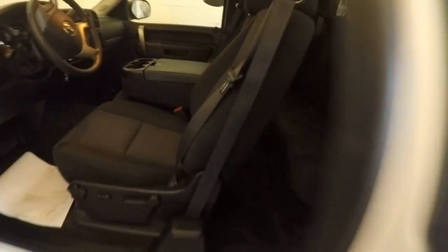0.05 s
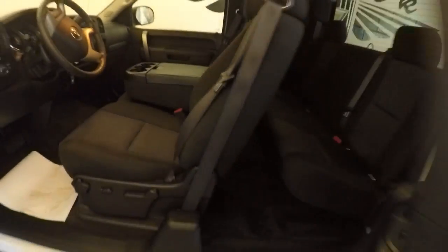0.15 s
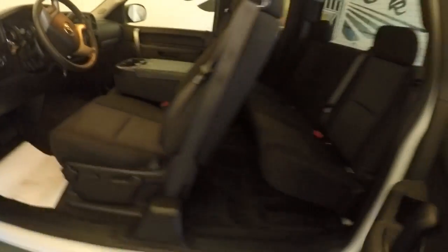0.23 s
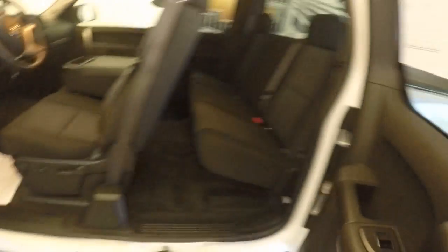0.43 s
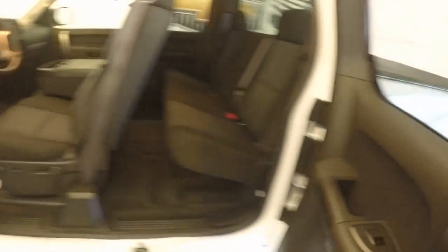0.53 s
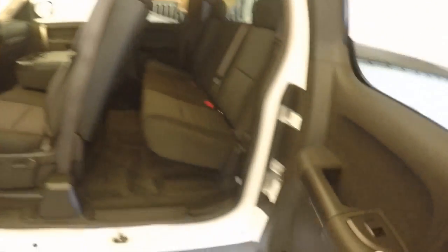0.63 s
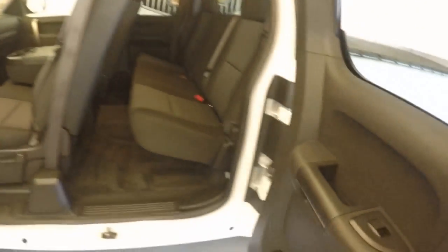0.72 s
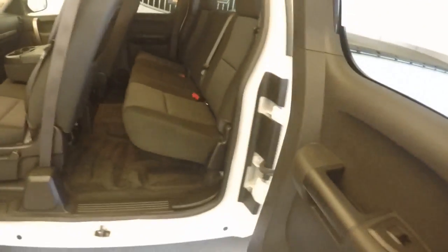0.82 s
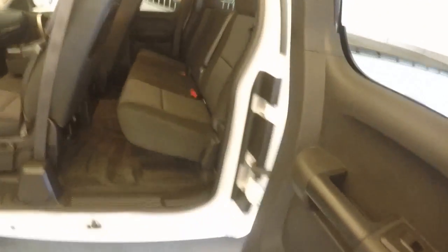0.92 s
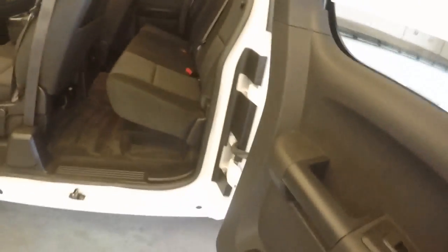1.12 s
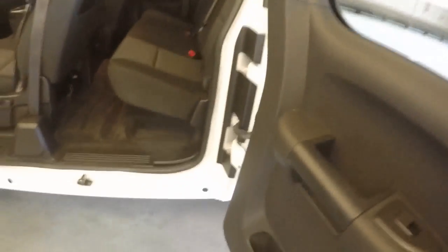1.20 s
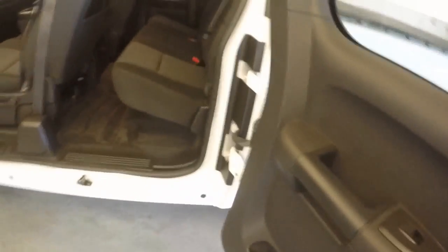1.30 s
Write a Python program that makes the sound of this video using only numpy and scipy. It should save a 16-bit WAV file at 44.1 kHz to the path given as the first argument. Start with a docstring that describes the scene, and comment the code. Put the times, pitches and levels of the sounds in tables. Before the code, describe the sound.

Close to a hand-held microphone in an open lot, a truck door latch clacks sharply, the panel knocks softly as the door swings, then thuds at its stop with little ticks, over quiet hiss and rumble.

```python
"""An open lot, a pickup door opened close to a hand-held camera and its microphone.
A latch snaps and rattles as decaying metal modes with noise cracks; the door shell rings on as a noise tail.
Knocks and bumps, soft blows on panel modes, follow as the door swings to its stop, with small ticks.
Beneath lie low rumble (a wavering tone in noise), distant traffic hiss and a rustle that follows the door
(both coloured noise), and the camera's faint whine, a pulsed sine."""
import sys
import numpy as np
from scipy import signal
from scipy.fft import rfft, irfft
from scipy.io import wavfile
from scipy.ndimage import uniform_filter1d

SR = 44100
rng = np.random.default_rng(int(sys.argv[2]) if len(sys.argv) > 2 else 0)


def wrap_up_sound(samples):
    """Save the sound to the file named by the first command line argument, as 16-bit audio."""
    columns = np.atleast_2d(samples).T
    # keep every value between -1 and 1, then stretch to whole-number steps
    tamed = np.clip(columns, -1, 1)
    steps = np.round(tamed * 32767).astype(np.int16)
    wavfile.write(sys.argv[1], SR, steps)


def decibels_to_gain(level_db):
    """Convert a level in decibels to a linear amplitude gain (20 dB per decade)."""
    exponent = np.asarray(level_db, float) / 20
    return 10 ** exponent


N = 59535  # samples, 1.35 s


def evened(x):
    """Scale to rms 1."""
    return x / np.sqrt(np.mean(x ** 2) + 1e-20)


def read_curve(points, hz, column=1):
    """Read a table column at the given frequencies, interpolating along log frequency."""
    table = np.transpose(points)
    return np.interp(np.log(hz + 1), np.log(table[0] + 1), table[column])


def along(points):
    """Read a (start_s, level_db) line at every sample."""
    return np.interp(np.arange(N) / SR, *np.transpose(points))


def add(mix, start_s, sound):
    """Lay a sound into the mix, cut off at the end."""
    part = mix[round(start_s * SR):][:len(sound)]
    part += sound[:len(part)]


def coloured(gain, size):
    """Noise of rms 1 with its spectrum shaped by gain(hz)."""
    spectrum = rfft(rng.standard_normal(size))
    return evened(irfft(spectrum * gain(np.fft.rfftfreq(size, 1 / SR)), size))


def around(hz, centre_hz, octaves):
    """Bell-shaped weight about a centre on an octave scale."""
    distance = np.log2((hz + 1) / centre_hz) / octaves
    return np.exp(-0.5 * distance ** 2)


def ring(modes, weights, share):
    """Struck metal: dying sines that start together, each t60 times share; peak 1."""
    t = np.arange(9000) / SR
    pitch_hz, level_db, t60_s = np.transpose(modes)[:, :, None]
    decay = decibels_to_gain(level_db - 60 * t / (t60_s * share))
    sines = np.sin(2 * np.pi * pitch_hz * t)
    sound = (weights[:, None] * decay * sines).sum(0)
    return sound / abs(sound).max()


BURST_LEAD_S = 0.002  # silence ahead of each burst, room for the colouring to spread


def burst(gain, t60_s):
    """A crack: dying noise, then coloured, scaled by energy to start near rms 1."""
    size = 4096
    t = np.arange(size) / SR
    decay = decibels_to_gain(-60 * (t - BURST_LEAD_S) / t60_s) * (t > BURST_LEAD_S)
    puff = rng.standard_normal(size) * decay
    sound = irfft(rfft(puff) * gain(np.fft.rfftfreq(size, 1 / SR)))
    decay_energy = SR * t60_s / np.log(1e6)
    return sound / np.sqrt(np.sum(sound ** 2) / decay_energy)


# level of the low rumble over time: start_s, level_db
RUMBLE_LEVEL = [(0.0, -44.5), (0.04, -41.5), (0.078, -56.5), (0.334, -61.5), (0.356, -82), (0.394, -42.5),
                (0.438, -79), (0.5, -48), (0.882, -61.5), (0.936, -37.5), (1.07, -49), (1.134, -49),
                (1.188, -63), (1.228, -46), (1.304, -61), (1.35, -90)]


def rumble():
    """Sub-bass from the swinging door skin and the wind: a wavering tone in lumpy noise."""
    centre_hz, width_hz = 32.5, 9.8
    waver_hz = 3.8  # rms
    tone_share = 0.64  # of the power

    def hump(hz):
        return 1 / (1 + ((hz - centre_hz) / width_hz) ** 2) * (hz > 12)

    lumps = coloured(hump, N)
    pitch_hz = centre_hz + waver_hz * coloured(lambda hz: hz < 8, N)
    boom = np.sqrt(2) * np.sin(2 * np.pi * (np.cumsum(pitch_hz) / SR + rng.random()))
    mixed = np.sqrt(tone_share) * boom + np.sqrt(1 - tone_share) * lumps
    return decibels_to_gain(along(RUMBLE_LEVEL)) * mixed


# colour of the distant traffic hiss: pitch_hz, level_db (per Hz, relative)
HISS_COLOUR = [(29, -53), (50, 2.5), (135, -8.5), (163, -12), (208, -5.5), (353, -18), (746, -19.5),
               (863, -25.5), (1620, -22.5), (12600, -38.5), (16000, -39.5)]


def traffic_hiss():
    """Distant traffic: steady coloured noise at -56.5 dB rms."""
    return decibels_to_gain(-56.5) * coloured(lambda hz: decibels_to_gain(read_curve(HISS_COLOUR, hz)), N)


# rustle of the swinging door over time: start_s, level_db
RUSTLE_LEVEL = [(0.0, -62), (0.334, -51), (0.548, -64.5), (0.812, -64.5), (1.048, -56.5), (1.35, -65.5)]
# colour of the rustle: pitch_hz, level_db (per Hz, relative)
RUSTLE_COLOUR = [(300, 0.5), (700, 0.5), (1450, -1), (1680, 3), (1950, -6), (2900, -4), (3550, -2.5),
                 (4200, -10), (7000, -19), (10000, -43)]


def rustle():
    """Coloured noise that swells and sinks with the swinging door."""
    noise = coloured(lambda hz: decibels_to_gain(read_curve(RUSTLE_COLOUR, hz)), N)
    return decibels_to_gain(along(RUSTLE_LEVEL)) * noise


def camera_whine():
    """The camera's thin high tone, switched on and off at a steady rate."""
    pitch_hz, level_db = 12407, -70
    pulses_per_s, on_s, first_s = 29.97, 0.0155, 0.0015
    t = np.arange(N) / SR
    on = ((t - first_s) % (1 / pulses_per_s) < on_s) * 1.0
    softened = uniform_filter1d(on, size=40)  # about 1 ms edges
    return decibels_to_gain(level_db) * softened * np.sin(2 * np.pi * pitch_hz * t)


# knocks in the door panel: start_s, level_db (before the blow softens it), centre_hz, width_octaves,
# ring_share (of each mode's t60)
KNOCKS = [(.200, -38, 600, 0.43, 3), (0.227, -27, 337, 0.11, 0.93), (.236, -33, 235, 0.053, 1.2),
          (0.357, -44, 270, 0.11, 2), (0.386, -33.5, 194, 0.18, 0.54), (0.399, -44, 239, 0.12, 0.52),
          (.466, -33, 335, 0.44, 2.6), (0.471, -29.5, 270, 0.28, 0.93), (.501, -39, 230, 0.31, 1.7),
          (0.604, -43.5, 550, 0.37, 0.26), (0.766, -51, 740, 0.13, 0.21), (0.881, -47, 284, 0.2, 1.7),
          (.889, -37, 313, 0.077, 1.7), (0.9066, -25.5, 600, 0.31, 0.93), (.9110, -25.5, 206, 0.39, 0.87),
          (.9170, -22, 203, 0.44, 0.42), (0.934, -29, 138.5, 0.47, 1.07), (0.942, -24, 350, 1, 0.52),
          (1.123, -41.5, 268, 0.27, 0.62), (1.134, -42.5, 260, 0.19, 0.27), (1.180, -39.5, 270, 0.14, 0.59),
          (1.230, -46, 784, 0.29, 0.61), (1.242, -41, 253, 0.24, 0.37), (1.272, -46, 270, 0.25, 0.46),
          (1.279, -36.5, 270, 0.15, 0.3), (1.285, -43, 720, 0.06, 0.22), (1.341, -38.5, 350, 0.69, 0.39)]
# modes of the door panel: pitch_hz, level_db (relative), t60_s (at ring_share 1)
PANEL_MODES = [(103, -6, 0.35), (128, -5, 0.2), (195.3, -7, 0.22), (235.5, -3, 0.1), (273.5, 6, 0.17),
               (320, 1, 0.13), (394, 9, 0.027), (550, -2.5, 0.19), (624, 4, 0.083), (720, 2.5, 0.14),
               (900, 11, 0.11), (1114, 5.5, 0.23)]


def panel_knocks():
    """Soft blows ring the panel modes near their centre; a longer blow rounds off the start."""
    blow_cycles = 0.32  # length of a blow in cycles of its centre pitch
    out = np.zeros(N)
    pitch_hz = np.transpose(PANEL_MODES)[0]
    for start_s, level_db, centre_hz, octaves, share in KNOCKS:
        scatter = decibels_to_gain(2.4 * rng.standard_normal(len(pitch_hz)))
        weights = around(pitch_hz, centre_hz, octaves) * scatter
        blow = np.hanning(int(blow_cycles * SR / centre_hz) + 3)
        knock = np.convolve(ring(PANEL_MODES, weights, share), blow / blow.sum())
        add(out, start_s, decibels_to_gain(level_db) * knock)
    return out


# ring of the hollow door and cab: pitch_hz, level_db (relative), t60_s
SHELL_RING = [(102, -6.5, 0.95), (270, -3, 0.37), (600, 4.5, 0.44), (1290, -3.5, 0.37), (2000, 2, 0.52),
              (2800, 2.5, 0.45), (5060, -1, 0.24), (7000, -0.5, 0.32), (14100, -1, 0.23)]


def shell_ring(struck):
    """The hollow door and cab ring on: three dense noise tails, each band dying at its own speed."""
    grain_db = 2.5  # loose parts make the ring grainy
    size = SR // 2
    out = np.zeros(N)
    for k in range(3):
        grain = np.repeat(rng.exponential(1, size // 50 + 1), 50)[:size]
        noise = rng.standard_normal(size) * decibels_to_gain(grain_db * grain)
        hz, t, bands = signal.stft(noise, SR, nperseg=256)
        t60_s = read_curve(SHELL_RING, hz, column=2)[:, None]
        tail = signal.istft(bands * decibels_to_gain(-60 * t / t60_s), SR, nperseg=256)[1]
        colour = decibels_to_gain(read_curve(SHELL_RING, np.fft.rfftfreq(len(tail), 1 / SR)))
        tail = irfft(rfft(tail) * colour, len(tail))
        tail = tail * np.minimum(np.arange(len(tail)) / SR / 0.0021, 1)  # 2.1 ms rise
        # the tails share the sound in turn, at constant total power
        turn = np.cos(2 * np.pi * (np.arange(N) / 2500 + k / 3)) * np.sqrt(2 / 3)
        out += signal.fftconvolve(struck * turn, tail / np.linalg.norm(tail))[:N]
    return out


# small ticks of the linkage and hinge: start_s, level_db, centre_hz, width_octaves,
# ring_share (of each mode's t60)
TICKS = [(0.2222, -37, 900, 1, .8), (0.474, -48, 1130, 0.21, 1.9), (0.603, -49, 1370, 0.3, 0.43),
         (0.9072, -33.5, 3750, 0.47, 0.41), (0.911, -32, 1710, 0.26, 0.67), (0.912, -44.5, 4540, 0.19, 1.5),
         (.921, -49.5, 4030, 0.63, 1.5), (1.026, -47, 2000, 0.74, 1), (1.204, -48, 1190, 0.088, 0.69),
         (1.235, -43, 1300, 0.33, 2.1), (1.2676, -40.5, 2610, 0.84, 0.26), (1.2701, -36, 1780, 0.22, 0.092),
         (1.283, -50, 1310, 0.2, 0.46)]
# modes of the latch, rung by ticks and snaps: pitch_hz, level_db (relative), t60_s (at ring_share 1)
LATCH_MODES = [(350, -3.5, 0.017), (710, -7, 0.031), (879, -23.5, 0.052), (1182, 1, 0.025),
               (1415, -1.5, 0.028), (1618, -16, 0.11), (1798, -11.5, 0.065), (2047, -15, 0.028),
               (2308, -4.5, 0.063), (2560, -18, 0.11), (3193, 6, 0.03), (3556, 0.5, 0.024),
               (3800, -10, 0.036), (4294, -19, 0.072), (4620, -14, 0.029), (5470, 1.5, 0.0049),
               (6820, -4, 0.011)]


def hinge_ticks():
    """Light contacts ring the latch modes near their centre, with a small crack."""
    crack_db, crack_t60_s = -14, 0.019  # level relative to the tick
    out = np.zeros(N)
    pitch_hz, mode_db, _ = np.transpose(LATCH_MODES)
    signs = (-1) ** np.arange(len(pitch_hz))
    for start_s, level_db, centre_hz, octaves, share in TICKS:
        # halves the level differences between modes, then scatters them
        evening = decibels_to_gain(-mode_db / 2 + 2 * rng.standard_normal(len(pitch_hz)))
        weights = signs * around(pitch_hz, centre_hz, octaves) * evening
        add(out, start_s, decibels_to_gain(level_db) * ring(LATCH_MODES, weights, share))
        crack = burst(lambda hz: around(hz, centre_hz, 2 * octaves), crack_t60_s)
        add(out, start_s - BURST_LEAD_S, decibels_to_gain(level_db + crack_db) * crack)
    return out


# contacts of the latch claw as it snaps free and bounces, before the low cut:
# start_s, level_db (ring), crack_db
SNAPS = [(.2241, -12, -19), (.2252, -11.5, -22), (0.2276, -19.5, -27), (0.2300, -25.5, -21),
         (.2320, -22, -22)]
# colour of the crack: pitch_hz, level_db (per Hz, relative)
CRACK_COLOUR = [(180, -48), (300, 4), (1230, 7), (2500, -9.5), (3580, 0), (4230, -3), (5430, -7.5),
                (14200, -26.5), (16000, -38)]


def latch_snaps():
    """Each contact rings the latch a little differently, duller each bounce, and cracks."""
    dulling_db = -3.5  # each bounce loses this much more for each octave above 2 kHz
    out = np.zeros(N)
    pitch_hz = np.transpose(LATCH_MODES)[0]
    octaves_up = np.maximum(np.log2(pitch_hz / 2000), 0)
    signs = (-1) ** np.arange(len(pitch_hz))
    for bounce, (start_s, level_db, crack_db) in enumerate(SNAPS):
        scatter_db = 2.65 * rng.standard_normal(len(pitch_hz))
        weights = signs * decibels_to_gain(scatter_db + dulling_db * bounce * octaves_up)
        add(out, start_s, decibels_to_gain(level_db) * ring(LATCH_MODES, weights, share=0.95))
        crack = burst(lambda hz: decibels_to_gain(read_curve(CRACK_COLOUR, hz)), t60_s=0.013)
        add(out, start_s - BURST_LEAD_S, decibels_to_gain(crack_db) * crack)
    low_cut = signal.butter(2, 220, "high", fs=SR, output="sos")
    return signal.sosfilt(low_cut, out)


def scene():
    """Latch, door and their shell ring, close by, over the sounds of the lot and the camera."""
    under = rumble() + traffic_hiss() + rustle() + camera_whine()
    door = panel_knocks() + hinge_ticks()
    latch = latch_snaps()
    shell = shell_ring(decibels_to_gain(-13.5) * latch + decibels_to_gain(-9.5) * door)
    return (latch + door + shell + under)[None]  # one channel


def band_limit(x):
    """A steep low-pass at the top of the band."""
    return signal.sosfilt(signal.butter(12, 16420, fs=SR, output="sos"), x)


def record(dry):
    """The microphone path rolls off below 20.4 Hz and above 15.4 kHz."""
    low_cut = signal.butter(2, 20.4, "high", fs=SR, output="sos")
    high_cut = signal.firwin(255, 15400, window=("kaiser", 2.5), fs=SR)
    trimmed = signal.sosfilt(low_cut, dry)
    mix = signal.oaconvolve(trimmed, high_cut[None], "same")
    return band_limit(mix)


dry = scene()
out = record(dry)
wrap_up_sound(out)
```